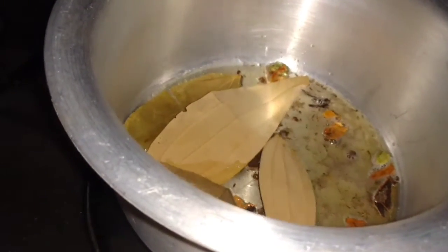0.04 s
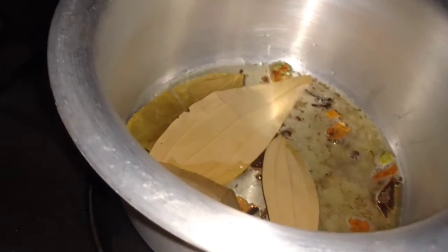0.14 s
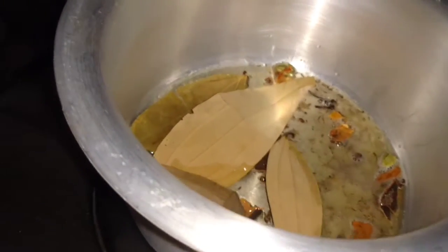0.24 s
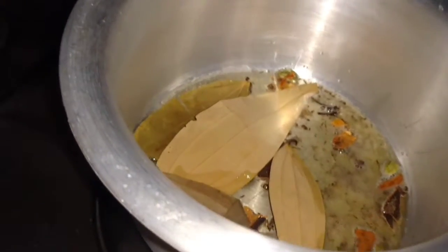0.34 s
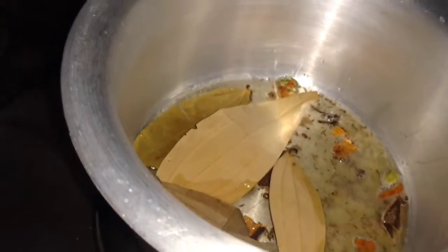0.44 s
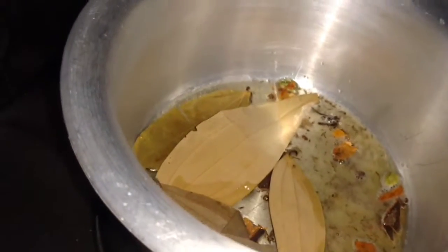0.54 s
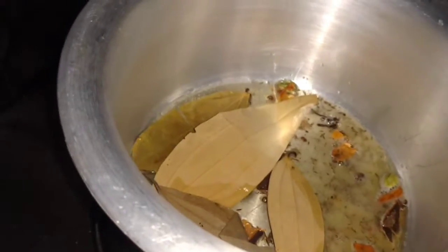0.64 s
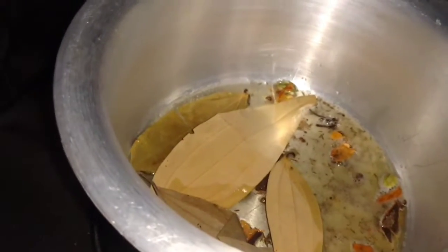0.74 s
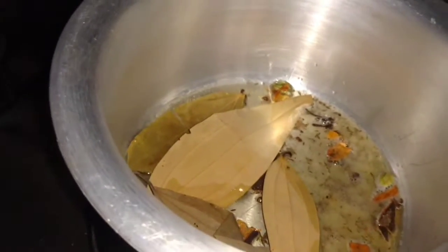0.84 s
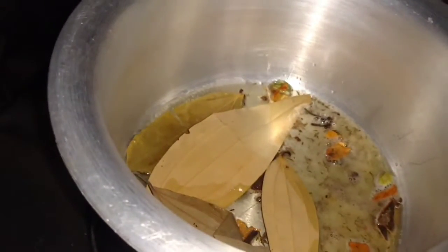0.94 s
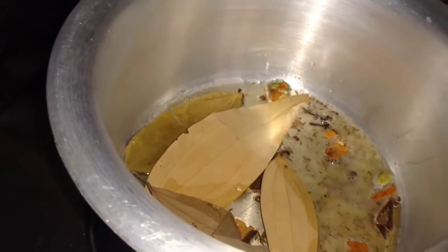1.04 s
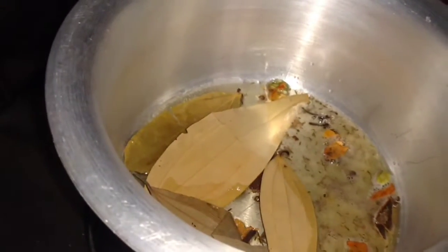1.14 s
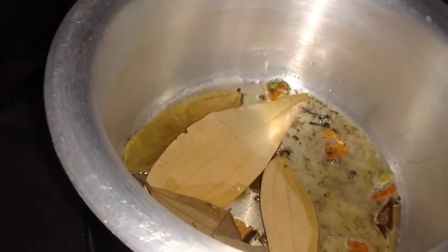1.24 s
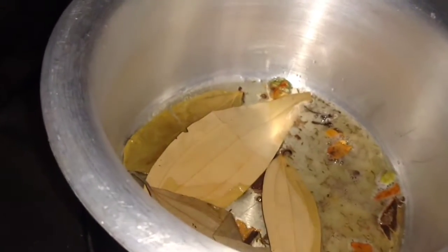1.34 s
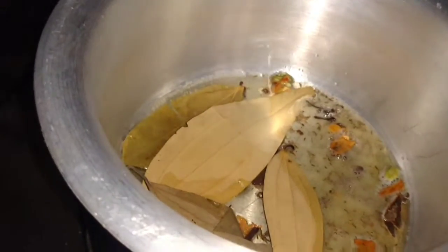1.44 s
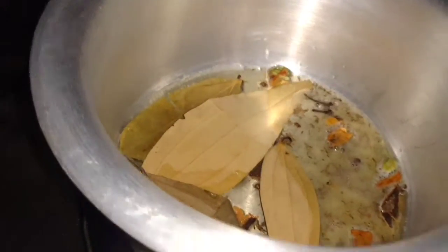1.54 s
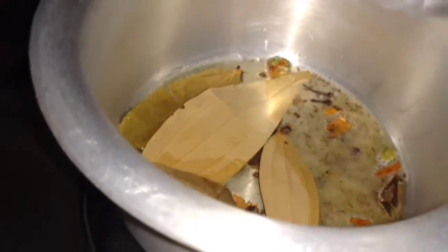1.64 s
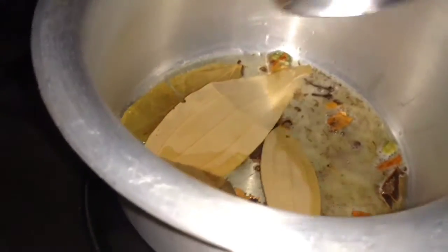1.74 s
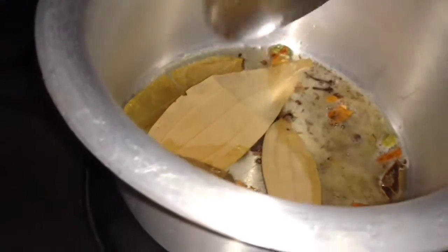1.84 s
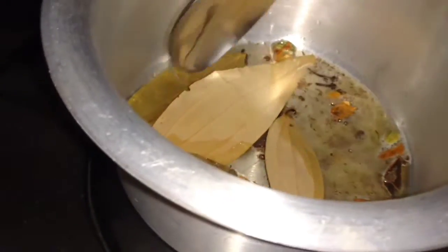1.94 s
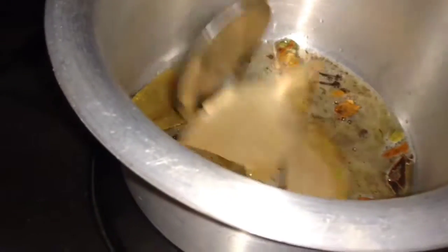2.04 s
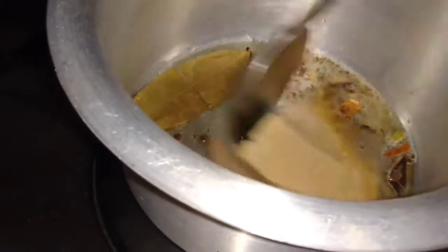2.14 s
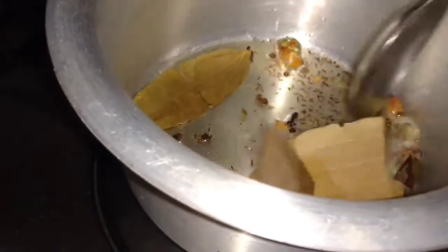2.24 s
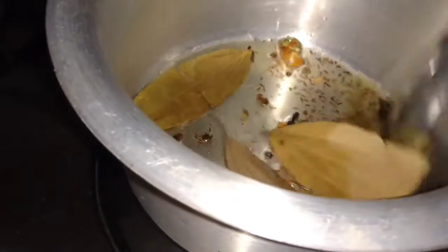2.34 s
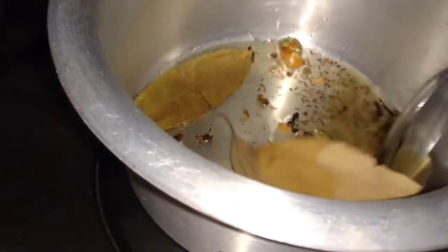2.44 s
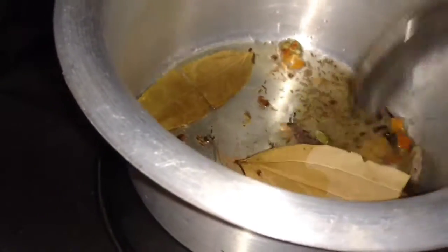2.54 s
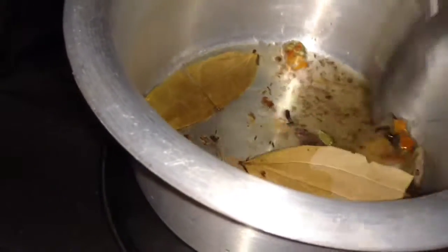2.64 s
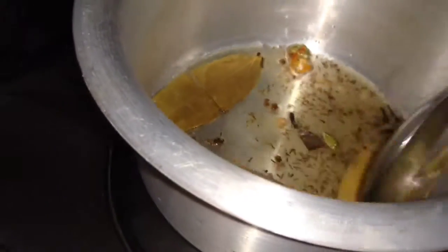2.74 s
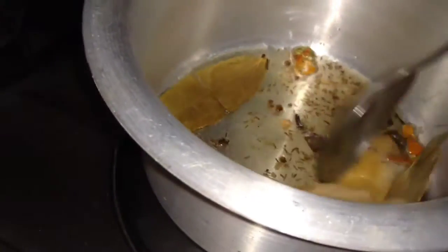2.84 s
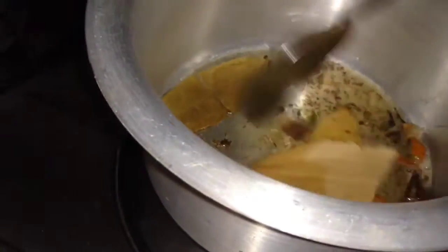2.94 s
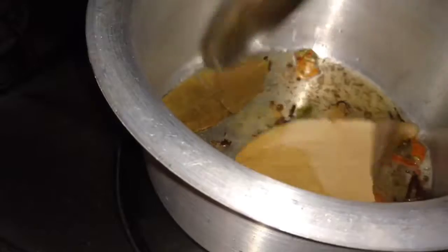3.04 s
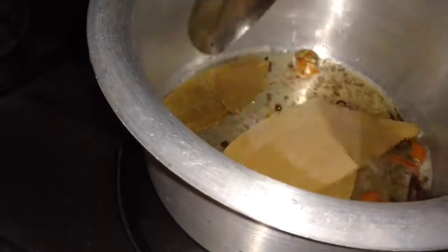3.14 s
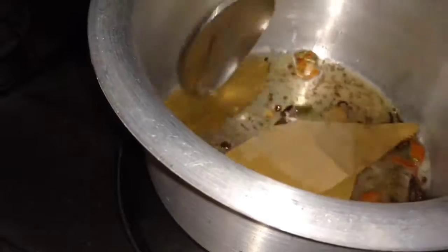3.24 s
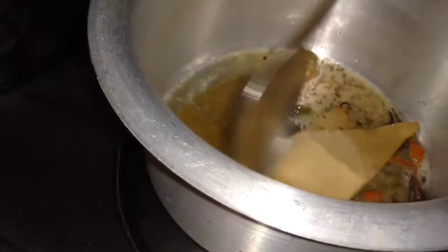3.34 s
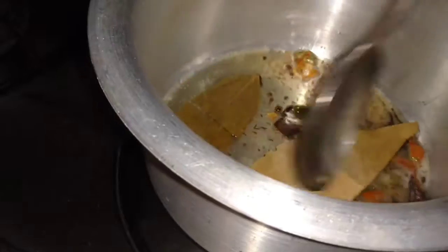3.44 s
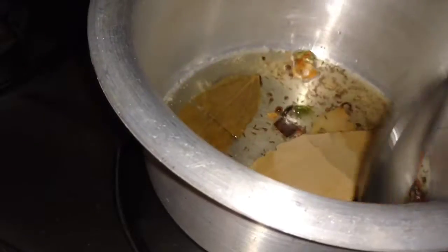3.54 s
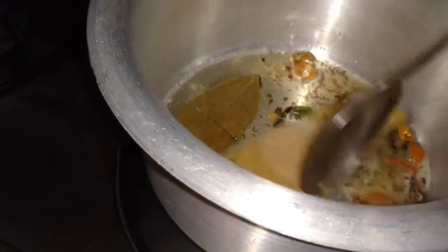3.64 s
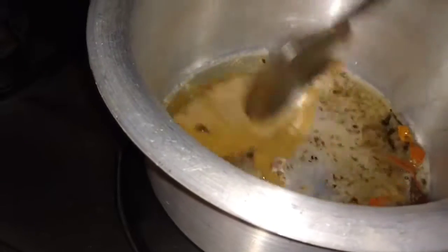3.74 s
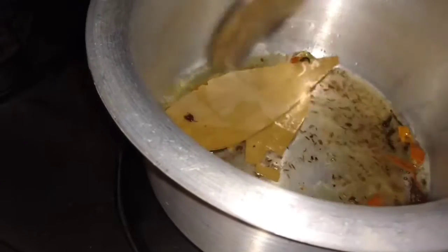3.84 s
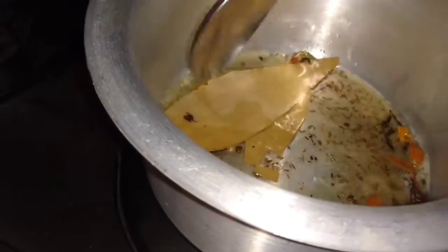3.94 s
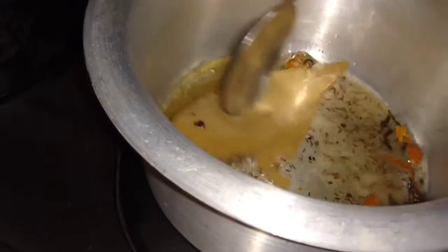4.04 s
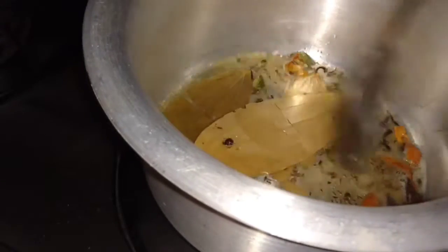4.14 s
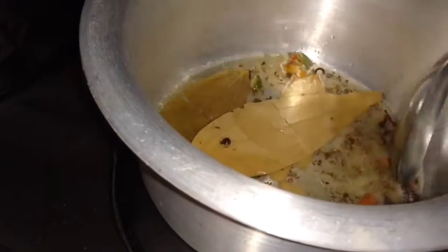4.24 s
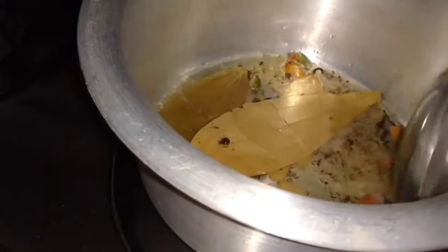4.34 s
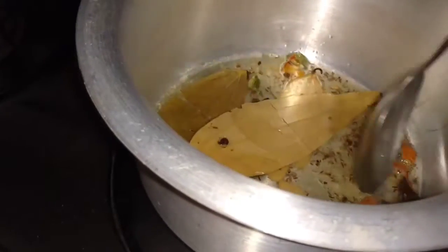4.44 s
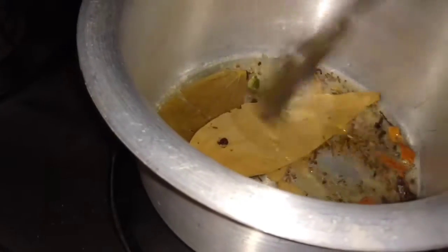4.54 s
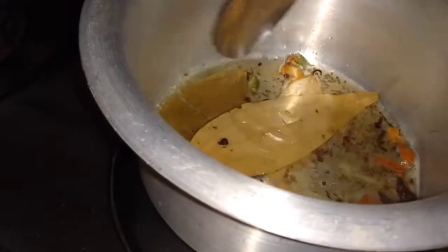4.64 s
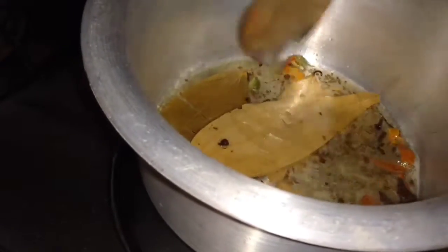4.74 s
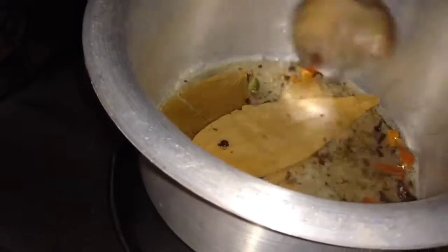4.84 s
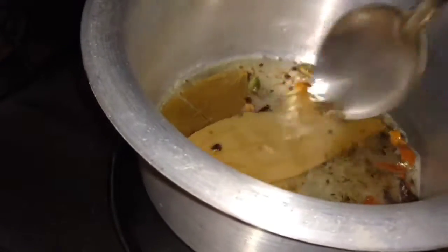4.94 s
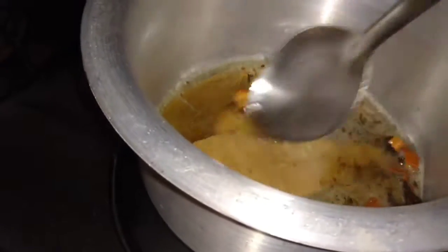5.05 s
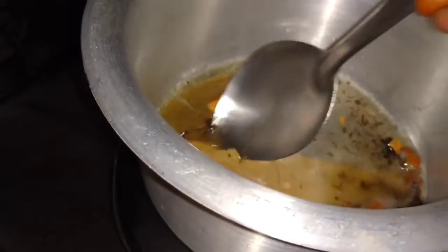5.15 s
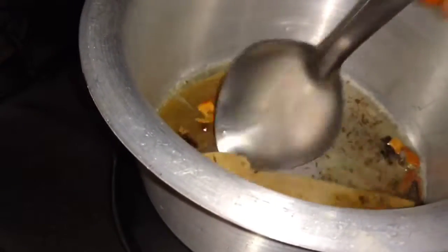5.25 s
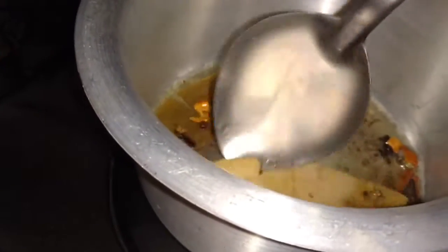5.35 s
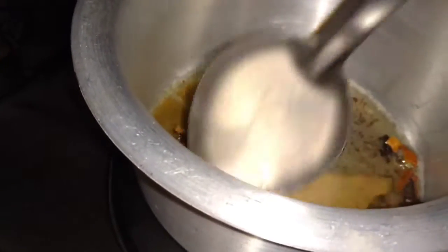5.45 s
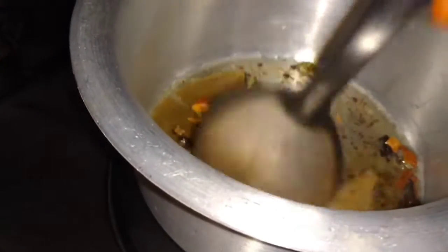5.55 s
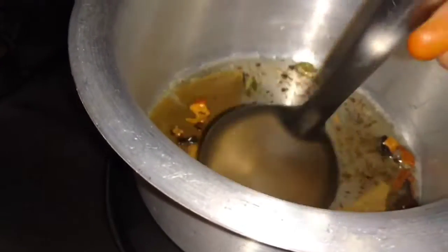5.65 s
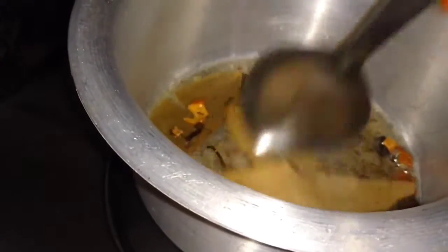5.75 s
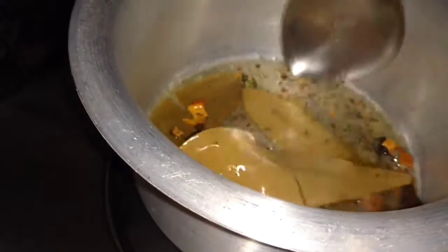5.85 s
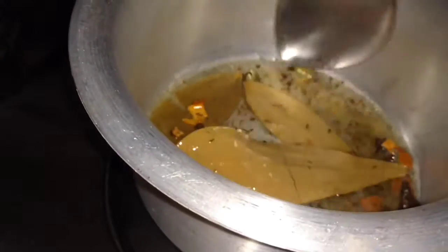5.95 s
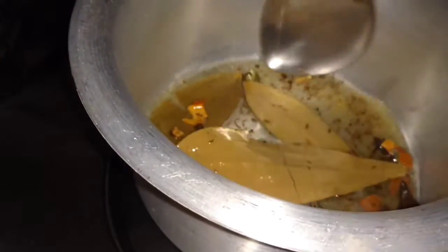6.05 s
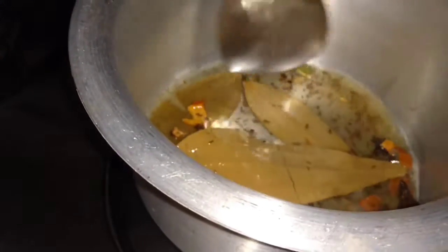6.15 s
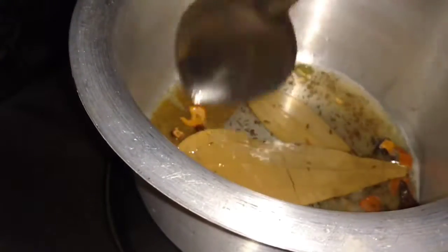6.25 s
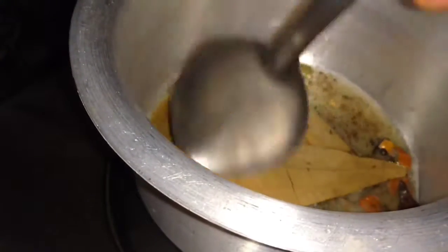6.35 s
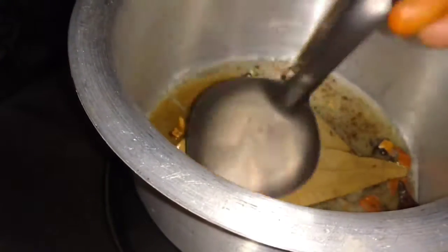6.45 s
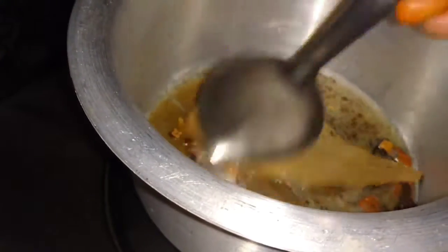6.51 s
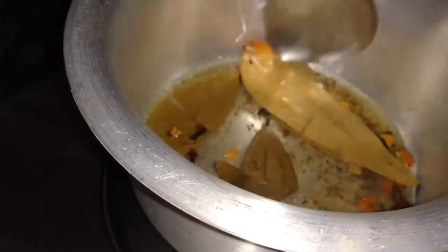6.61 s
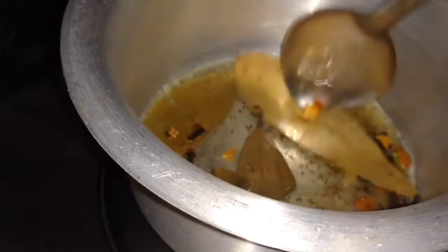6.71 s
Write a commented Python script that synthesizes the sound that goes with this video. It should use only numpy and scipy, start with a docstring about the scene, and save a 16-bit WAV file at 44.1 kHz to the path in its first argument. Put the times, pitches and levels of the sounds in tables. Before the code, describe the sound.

Heard close above a metal pot in a small kitchen, hot oil fizzes faintly and snaps around whole spices while the stove rushes low underneath. After an early bright clink, a steel spoon thumps hard on the bottom and stirs in brief, uneven scrapes and knocks. One blow on the side leaves a ringing clang, then the stirring continues more lightly, ending in quick clicks and scraping.

```python
"""A steel spoon stirs whole spices in a little hot oil at the bottom of a metal pot.
It clinks as it is picked up, thumps and scrapes on the bottom and once strikes the side, which rings on.
Steam bubbles burst in the oil, sizzling and spitting over the low rush of the stove.
Two closely spaced microphones hear it from above the rim, in a small kitchen."""
import sys
import numpy as np
from scipy import signal
from scipy.fft import rfft, irfft, next_fast_len
from scipy.io import wavfile
from scipy.ndimage import map_coordinates

SR = 44100
rng = np.random.default_rng(int(sys.argv[2]) if len(sys.argv) > 2 else 0)


def int16_out(signal):
    """Quantize to a 16-bit WAV file."""
    q = np.round(np.clip(np.atleast_2d(signal).T, -1, 1) * 32767)
    wavfile.write(sys.argv[1], SR, q.astype(np.int16))


N = 298998

# modes: (frequency [Hz], relative level [dB], free t60 [s])
POT_MODES = [(293, -20, 0.37), (352, -26.5, 0.06), (451.4, -17, 0.59), (474, -1, 0.1), (512.5, -10, 0.18),
             (556, -2.5, 0.068), (622, -25, 0.68), (750.5, -20, 0.09), (909, -6, 0.031),
             (1006, -19.5, 0.15), (1114, -17.5, 0.065), (1266.5, -12.5, 0.08), (1296, -16, 0.16),
             (1555, -39.5, 0.68), (1954, -32, 0.15), (2130, -50, 0.079)]  # bottom and the air above it
SPOON_MODES = [(2923, -30, .25), (3540, -31, .16), (4840, -33, .22), (5981, -33, .4), (6610, -23, .15),
               (6835, -20, .2), (7800, -27, .15), (8393, -24, .22), (9020, -29, .08), (10720, -29, .13),
               (10910, -24, .13), (12900, -30, .08), (13800, -30, .07)]
EDGE_MODES = [(1620, -6, 0.0046), (3160, -5.5, 0.0012), (6300, -14, 0.0012), (9300, -28, 0.00354),
              (12500, -34.5, 0.0033)]  # first milliseconds of steel on metal
# noise spectra: (frequency [Hz], relative density [dB])
SIZZLE_SPECTRUM = [(300, -37), (900, -0.5), (1350, 0), (2200, -1.5), (3200, 7), (4200, -0.5), (5200, 4),
                   (6500, 1), (8000, -3), (10500, -5.5), (12500, -11), (15300, -14), (16000, -23.5)]
RASP_SPECTRUM = [(200, -24), (700, 2.5), (1300, 5), (1800, 0), (2400, 7), (3400, 10.5), (4800, 2),
                 (7000, 3.5), (10000, -7), (13000, -12.5), (15500, -20.5)]
SNAP_SPECTRUM = [(300, 0), (1200, 0), (3000, -0.5), (5500, 11), (8000, 1.5), (12000, -9.5), (16000, -43)]
# recorder's gain on sizzle and rush, a preset curve; ducks after loud blows, slowly recovers:
# (time [s], gain [dB])
BACKGROUND_GAIN_DB = [(0, -53.5), (.38, -51.5), (.87, -45.5), (1.04, -52.5), (1.56, -47.5), (2.08, -46),
                      (2.27, -56), (2.68, -55.5), (3.1, -50.5), (4.23, -51), (4.55, -63), (4.8, -65.5),
                      (5.35, -57), (5.85, -53.5), (6.4, -50), (6.78, -43.5)]


def amp(db):
    """Decibels to gain."""
    return 10 ** (np.asarray(db) / 20)


def unit(x):
    """Scale to rms 1."""
    return x / np.sqrt(np.mean(x ** 2) + 1e-20)


def along(points, hz):
    """Interpolate (frequency [Hz], value) points on a log axis."""
    knots_hz, values = np.transpose(points)
    return np.interp(np.log(hz + 1), np.log(knots_hz + 1), values)


def background_gain_db():
    """Preset recorder gain on sizzle and rush, per sample."""
    return np.interp(np.arange(N) / SR, *np.transpose(BACKGROUND_GAIN_DB))


def wobble(rate_hz, size):
    """Smooth curve through random knots."""
    knots = rng.standard_normal(int(size * rate_hz / SR) + 4)
    return map_coordinates(knots, [np.arange(size) * rate_hz / SR])


def filtered(x, response):
    """Apply a complex frequency response."""
    size = x.shape[-1]
    padded = next_fast_len(size + 8192)
    return irfft(rfft(x, padded) * response(np.fft.rfftfreq(padded, 1 / SR)), padded)[..., :size]


def coloured(x, spectrum):
    """Shape x by a spectrum; rms 1."""
    return unit(filtered(x, lambda hz: amp(along(spectrum, hz))))


def add(track, start_s, sound):
    """Mix a sound into the track."""
    start = round(start_s * SR)
    track[start:start + len(sound)] += sound[:N - start]


def grains(rate_hz, spread_db, size):
    """Random impulses of unequal size."""
    hits = rng.random(size) < rate_hz / SR
    return hits * rng.choice([-1, 1], size) * amp(spread_db * rng.standard_normal(size))


def burst(t, t60_s, spectrum):
    """Noise with instant onset and exponential decay."""
    return coloured(rng.standard_normal(len(t)), spectrum) * amp(-60 * t / t60_s)


def ring(modes, t, scatter_db):
    """Decaying modes; levels vary from blow to blow."""
    return sum(amp(db + scatter_db * rng.standard_normal() - 60 * t / t60_s) * np.sin(2 * np.pi * hz * t)
               for hz, db, t60_s in modes)


def tilted(modes, db_per_octave, t60_scale=1):
    """Harder contact favours the high modes; a pressed spoon shortens them."""
    return [(hz, db + db_per_octave * np.log2(hz / modes[0][0]), t60_s * t60_scale)
            for hz, db, t60_s in modes]


def resonate(x, modes):
    """Drive modes with x at about unit gain."""
    response = ring(modes, np.arange(SR // 4) / SR, scatter_db=3.5)
    return signal.fftconvolve(x, response / np.linalg.norm(response))


def radiated(x, corner_hz, leak_db):
    """The small pot radiates little bass; a faint thud passes through the stove."""
    highpass = signal.butter(3, corner_hz, "highpass", fs=SR, output="sos")
    return signal.sosfilt(highpass, x) + amp(leak_db) * x


def snaps(events, rise_cycles, crack_db, spray_db, spray_t60_s):
    """Per event: a few cycles of high tone, a sharp crack, a short noise spray."""
    out, t = np.zeros(N), np.arange(SR // 16) / SR
    for start_s, db, hz in events:
        rise = t * hz / rise_cycles
        tone = rise * np.exp(1 - rise) * np.sin(2 * np.pi * hz * t)
        crack = amp(crack_db) * burst(t, 0.0022, SNAP_SPECTRUM)
        spray = amp(spray_db) * burst(t, spray_t60_s, SIZZLE_SPECTRUM)
        add(out, start_s + 0.00049, amp(db) * (tone + crack + spray))
    return out


def kitchen(x, wide_hz):
    """Short diffuse tail, narrowing to mono below wide_hz."""
    # room decay: (frequency [Hz], t60 [s])
    decay = [(100, 0.24), (500, 0.49), (3000, 0.35), (14000, 0.24)]
    hz, t, spectra = signal.stft(rng.standard_normal((2, SR // 2)), SR, nperseg=256)
    spectra *= amp(-60 * t / along(decay, hz)[:, None])
    spectra[1] *= (hz / (hz + wide_hz))[:, None]
    mid, side = signal.istft(spectra, SR, nperseg=256)[1]
    tail = np.array([mid + side, mid - side]) / np.linalg.norm(mid)
    delayed = np.pad(tail, ((0, 0), (SR // 250, 0)))
    return signal.fftconvolve(x[None], delayed, axes=1)[:, :N]


def microphones(x, lag_s, in_phase_below_hz):
    """Close pair: treble reaches the right one first; bass is in phase."""
    def response(hz):
        phase = np.pi * lag_s * np.maximum(hz - in_phase_below_hz, 0)
        left_db = along([(1300, 1.0), (3000, 0.2), (5500, -1.7), (9000, -1.0), (14000, 1.5)], hz)
        return np.array([amp(left_db) * np.exp(-1j * phase), amp(-left_db) * np.exp(1j * phase)])
    return filtered(x, response)


def stove_rush():
    """Low rush of the stove, with a hum from the pot's hollow."""
    # rush and hum: (frequency [Hz], relative density [dB])
    spectrum = [(20, -44.5), (55, -27), (90, 0.5), (230, 1), (330, 5.5), (410, 0.5), (447, 12), (490, 2),
                (650, 6.5), (1000, -2.5), (1330, 5), (2200, -24), (6000, -71)]
    # left-right likeness: (frequency [Hz], correlation [0..1])
    correlation = [(30, .1), (90, 0.033), (180, 0.17), (350, 0.12), (1000, 1)]

    def mid_side_gains(hz):
        angle = np.arccos(np.clip(along(correlation, hz), -1, 1)) / 2
        return np.array([np.cos(angle), np.sin(angle)])
    mid, side = filtered(rng.standard_normal((2, N)), mid_side_gains)
    return amp(background_gain_db() - 3) * coloured(np.array([mid + side, mid - side]), spectrum)


def oil_sizzle():
    """Countless tiny steam bubbles burst; a few larger ones tick brightly."""
    # small pops: (frequency [Hz], relative density [dB])
    tick_spectrum = [(300, -22), (3000, -10), (6500, 7), (10000, -2), (15000, 1), (16000, -17)]
    fizz = coloured(grains(rate_hz=7000, spread_db=3.5, size=N), SIZZLE_SPECTRUM)
    ticks = amp(-16) * coloured(grains(rate_hz=30, spread_db=4.5, size=N), tick_spectrum)
    flicker_db = 0.23 * wobble(rate_hz=6, size=N)
    return amp(background_gain_db() + 3 + flicker_db) * (fizz + ticks)


def oil_spits():
    """Hot oil spits in single bright snaps."""
    # (time [s], relative level [dB], pitch [Hz])
    spits = [(0.072, -19.5, 6400), (0.4532, -24.5, 6900), (0.6672, -20.5, 6670), (0.691, -15.5, 8250),
             (0.7663, -24, 10900), (1.0005, -21.5, 5500), (1.1122, -24, 6740), (1.3328, -25, 6400),
             (1.4352, -23.5, 7400), (1.6816, -17.5, 6400), (2.3935, -31, 8600), (2.4275, -27, 6600),
             (3.3071, -19, 8300), (3.9583, -16, 6300), (4.1687, -17, 5540), (4.2105, -24.5, 5260),
             (5.569, -24.5, 6430), (6.0543, -24.5, 6450)]
    return amp(7) * snaps(spits, rise_cycles=1.15, crack_db=-10, spray_db=-21, spray_t60_s=0.045)


def spoon_clicks():
    """The spoon's edge clicks on the metal."""
    # (time [s], relative level [dB], pitch [Hz])
    clicks = [(2.107, -19, 3810), (2.5465, -30.5, 3420), (3.327, -20, 4420), (4.0287, -27.5, 3200),
              (4.1688, -17, 3600), (6.4179, -19.5, 2890), (6.4449, -22, 2900), (6.559, -18.5, 3250),
              (6.6569, -13.5, 2980), (6.6755, -19.5, 3090), (6.6881, -23, 3080)]
    return amp(1) * snaps(clicks, rise_cycles=2.2, crack_db=-9.5, spray_db=-27, spray_t60_s=0.036)


def spoon_clink(first_s, second_s):
    """The lifted spoon touches the pot twice; the first contact rings the steel."""
    out, t = np.zeros(N), np.arange(SR // 2) / SR
    pot = amp(-56.5) * ring(tilted(POT_MODES, db_per_octave=12, t60_scale=1.5), t, scatter_db=1)
    steel = amp(-2) * ring(SPOON_MODES, t, scatter_db=1)
    add(out, first_s, pot + steel + amp(-21.5) * burst(t, 0.06, SIZZLE_SPECTRUM))
    add(out, second_s, amp(-20) * burst(t, 0.023, SIZZLE_SPECTRUM))
    return radiated(out, corner_hz=604, leak_db=-42)


def push(t, length_s, attack_s=0.0045, release_t60_s=0.1, arch_db=1.5):
    """Pressure envelope: the spoon bites, presses hardest halfway, lifts off."""
    attack = np.minimum(t / attack_s, 1)
    arch = np.sin(np.pi * np.minimum(t / length_s, 1))
    release_db = -60 * np.maximum(t - length_s, 0) / release_t60_s
    return attack * amp(arch_db * (arch - 1.5) + release_db)


def spoon_scrapes():
    """Stick-slip: coarse slips shake the pot; fine grit rasps and rings the steel."""
    # (start [s], length [s], rumble [dB], rasp [dB], contact resonance [Hz], hardness [dB/octave])
    strokes = [(2.079, 0.0092, -24.5, -23.5, 1314, 24), (2.103, 0.022, -29, -36.5, 1300, 10),
               (2.893, 0.07, -31.5, -47, 440, 10), (3.29, 0.1, -28.5, -43, 451, 8.5),
               (3.68, .03, -48, -40.5, 530, 12), (3.719, 0.097, -32.5, -39.5, 465, 1),
               (4.043, 0.12, -40.5, -42, 470, -6), (4.856, 0.1, -30.5, -48.5, 650, 15),
               (4.964, 0.074, -31.5, -39, 553, 15), (5.102, 0.051, -28, -38.5, 580, 12.5),
               (5.545, 0.055, -69, -45.5, 600, 6), (5.732, 0.036, -45.5, -45.5, 510, 13),
               (6.411, 0.077, -38, -45.5, 490, 12), (6.49, 0.061, -33.5, -32.5, 520, 8),
               (6.549, 0.49, -43, -45.5, 510, 25), (6.746, 0.021, -31, -33.5, 450, -19)]
    out, t = np.zeros(N), np.arange(SR // 3) / SR
    for start_s, length_s, rumble_db, rasp_db, contact_hz, hardness in strokes:
        pressure = push(t, length_s)
        rumble_gain, rasp_gain = amp(rumble_db) * pressure, amp(rasp_db) * pressure
        judder = amp(2.2 * wobble(rate_hz=90, size=len(t)))
        slips = unit(grains(rate_hz=1300, spread_db=1, size=len(t)) * judder) * rumble_gain
        grit = unit(grains(rate_hz=2600, spread_db=3, size=len(t)) * judder)
        contact = amp(-7) * resonate(slips, [(contact_hz, 0, 0.036)])  # damped metal under the spoon
        pot = amp(-8.5) * resonate(slips, tilted(POT_MODES, hardness, t60_scale=0.89))
        steel = amp(-5) * resonate(grit * rasp_gain, tilted(SPOON_MODES, -10.5, t60_scale=0.38))
        add(out, start_s, radiated(contact + pot, corner_hz=316, leak_db=-39.5) + steel)
        add(out, start_s, amp(3) * coloured(grit, RASP_SPECTRUM) * rasp_gain)
    return out


def spoon_thumps():
    """Blows on the bottom boom through the oil; harder contact rings brighter."""
    # (time [s], level [dB], hardness [dB/octave], relative edge crack [dB])
    blows = [(2.089, -31, 14, -11.5), (2.1341, -1.5, 1, 5), (2.735, -30, 22, 3), (3.273, -11.5, -0.5, -6),
             (3.288, -15.5, -6, -15), (3.707, -13, -7.5, -16), (4.029, -35, 25, 12), (4.055, -31, -13, -14),
             (4.104, -23, 1, -20), (4.113, -21.5, -6, -4), (4.433, -35.5, -19, -20),
             (4.858, -18.5, 12.5, 4), (5.096, -24.5, 7, 8), (5.203, -24, 2, 0.5), (5.623, -36.5, -23, -20),
             (5.75, -34.5, -1, -4), (6.591, -29, 11, 0.5)]
    out, t = np.zeros(N), np.arange(SR // 2) / SR
    for start_s, db, hardness, crack_db in blows:
        pot = ring(tilted(POT_MODES, hardness), t, scatter_db=1.5)
        edge = ring(EDGE_MODES, t, scatter_db=1)
        boom = radiated(pot, corner_hz=348, leak_db=-26)
        crack = amp(-11.5) * edge + amp(-12) * burst(t, 0.027, RASP_SPECTRUM)
        add(out, start_s, amp(db) * (boom / np.abs(boom).max() + amp(crack_db) * crack))
    return out


def spoon_clang(strike_s):
    """The spoon's edge strikes the side: a short crack, then the wall rings freely."""
    # side wall, lowest mode a close pair: (frequency [Hz], relative level [dB], t60 [s])
    wall_modes = [(619, -39, 2.6), (624, -21.5, .62), (1460, -21.5, 1.1), (1944, -24, .72),
                  (2218, -28.5, .6), (2541, -29.5, .5), (2988, -29, .5), (3569, -45, .9), (4027, -29, .38),
                  (4113, -30, .25), (4253, -35, .65), (4452, -32, .42), (5039, -39, .45), (5710, -29, .3),
                  (5916, -34, .38), (6584, -35, .3), (6896, -35, .28), (7260, -38, .3), (10322, -35, .16)]
    out, t = np.zeros(N), np.arange(3 * SR // 2) / SR
    crack = amp(3) * ring(EDGE_MODES, t, scatter_db=0.5)
    noise = amp(-12) * burst(t, 0.044, SNAP_SPECTRUM)
    wall = amp(-2.5) * ring(wall_modes, t, scatter_db=0)
    add(out, strike_s, radiated(wall + crack + noise, corner_hz=500, leak_db=-13))
    return out


def scene():
    """Spoon and oil sound from inside the pot, over the stove's rush."""
    bottom = oil_spits() + spoon_clicks() + oil_sizzle()
    bottom += spoon_clink(first_s=0.8828, second_s=0.8895) + spoon_scrapes() + spoon_thumps()
    wall = spoon_clang(strike_s=4.2496)
    direct = microphones(bottom + wall, lag_s=0.0004, in_phase_below_hz=1280)
    room = kitchen(amp(-13.5) * bottom + amp(-19.5) * wall, wide_hz=406)  # wall is closer, so drier
    return direct + room + stove_rush()


def record(dry):
    """Clip the loudest peaks, then limit the band."""
    low_hz, top_hz = 45, 16400
    return filtered(np.clip(dry, -1, 1), lambda hz: (hz < top_hz) * hz / np.hypot(hz, low_hz))


dry = scene()
out = record(dry)
int16_out(out)
```